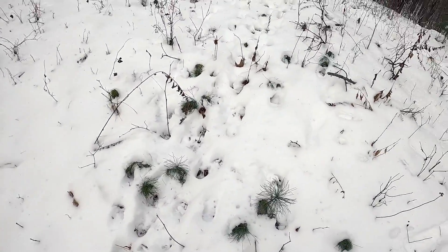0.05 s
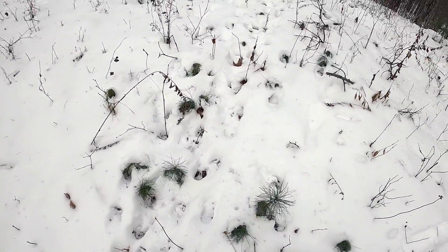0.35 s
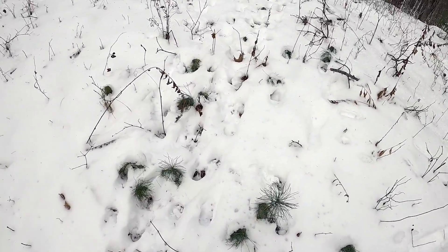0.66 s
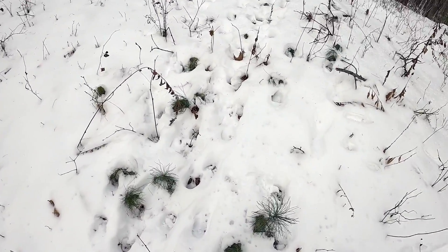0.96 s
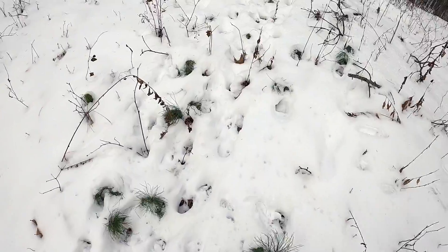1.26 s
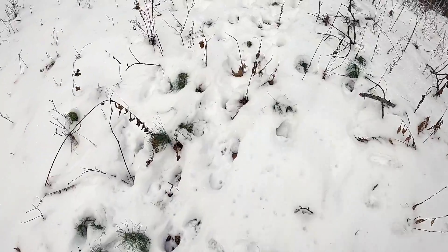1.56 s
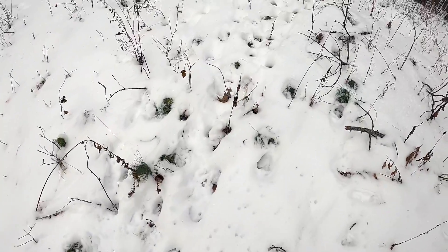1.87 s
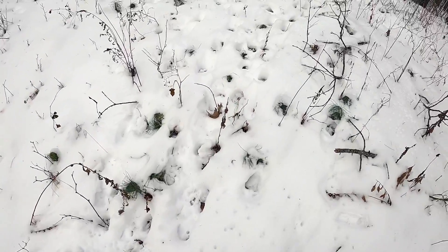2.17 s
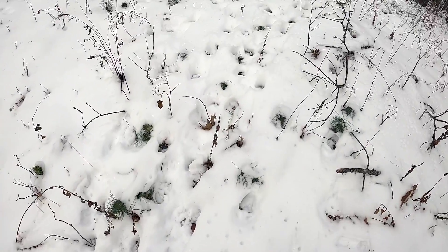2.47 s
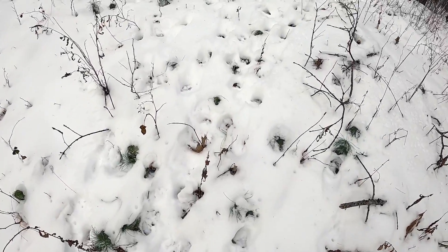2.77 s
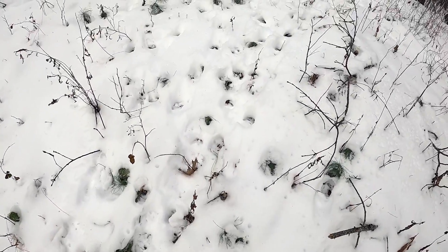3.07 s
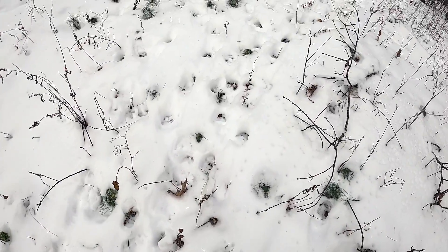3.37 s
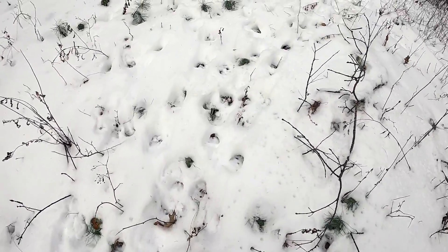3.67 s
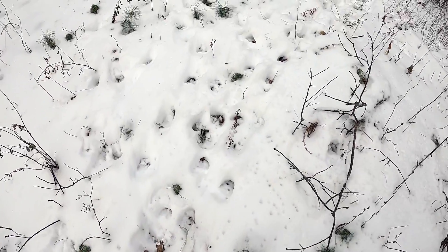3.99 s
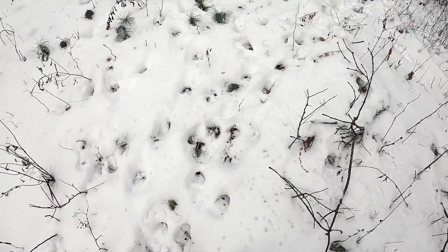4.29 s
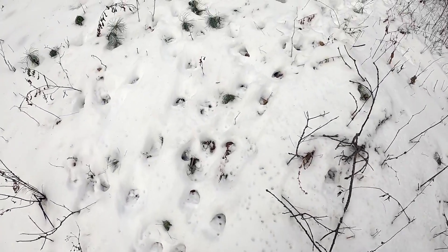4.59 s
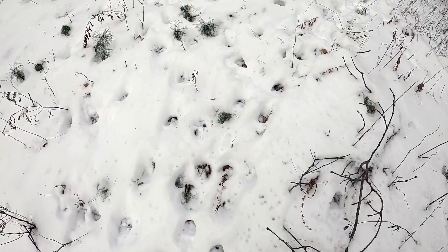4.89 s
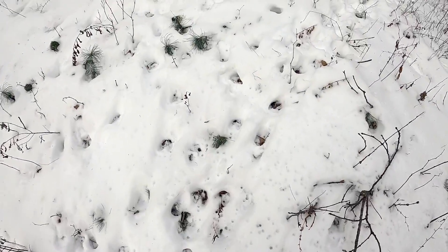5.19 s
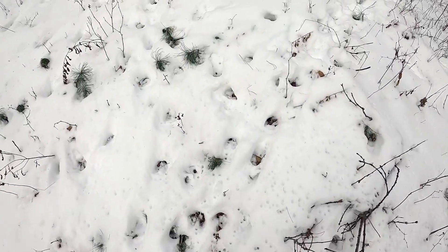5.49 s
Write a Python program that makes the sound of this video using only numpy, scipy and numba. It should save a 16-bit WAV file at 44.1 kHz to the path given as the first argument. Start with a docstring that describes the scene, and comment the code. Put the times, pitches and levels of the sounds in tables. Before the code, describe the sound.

Slow footsteps in ankle-deep snow are heard close, from the walker's hands, over the faint steady hush of still, echoless woods. Loose powder rustles and ticks softly at first, then the first boot lands at about 0.6 seconds. Further steps follow at about 1.3, 2.4, 3.5 and 4.7 seconds, the last three a little louder. Each one breaks the crust with a crisp, grainy crunch and packs the snow down in small, dull collapses, sometimes sinking in two or three goes. Between the steps the boots drag and swing on with quieter scuffs, bits of crust cracking and powder hissing. After the fifth step fades, a few light scuffs come from about 5.2 seconds, and at 5.6 seconds a dry twig snaps sharply, slightly to the right, with a short woody knock.

```python
"""Five slow steps through ankle-deep snow in still, echoless woods, heard from the walker's hands.
Loose powder rustles over a faint hush, then the first boot lands at 0.6 s. Each step breaks the crust,
crushes the grains and packs them in small dull collapses; then the boot drags and swings on, with bits
of crust cracking and powder hissing. The fifth step sinks in at 4.7 s, and at 5.6 s a twig snaps."""
import sys
import numpy as np
from scipy import signal
from scipy.fft import rfft, irfft, next_fast_len
from scipy.io import wavfile
from scipy.ndimage import uniform_filter1d
from numba import njit

SR = 44100
rng = np.random.default_rng(int(sys.argv[2]) if len(sys.argv) > 2 else 0)


def digitize_waveform(pressure):
    """Quantize a signal to 16-bit integers and store it at the path in sys.argv[1].

    Rows of a 2-D input are taken as channels; values are limited to [-1, 1].
    """
    field = np.atleast_2d(pressure).T
    bounded = np.clip(field, -1, 1)
    quanta = np.round(bounded * 32767).astype(np.int16)
    wavfile.write(sys.argv[1], SR, quanta)


N = 249089
TIME = np.arange(N) / SR

# EQ curves of the still air, the four snow layers and a brittle break: (frequency [Hz], level [dB])
AIR_EQ = [(20, -2), (60, 6.5), (100, -13), (200, 5), (330, -4.5), (750, -21), (1400, -11), (4000, -38),
          (9000, -53), (16000, -82)]
PACKING_EQ = [(20, -31), (45, -19), (85, -10.5), (130, -4), (180, 3.5), (280, -2), (390, -5.5), (520, -24),
              (1000, -68)]
CRUNCH_EQ = [(150, -32), (300, -8), (430, -0.5), (720, -2.5), (1100, -0.5), (1600, -5), (2100, -14.5),
             (4000, -51.5)]
CRUST_EQ = [(700, -27.5), (1400, -6.5), (1950, -1), (3100, -2), (4200, -5), (5600, -11.5), (7000, -14),
            (11000, -49)]
POWDER_EQ = [(3000, -25), (5000, 2), (6200, 0.5), (7000, -2.5), (8200, -1.5), (10000, -6.5), (12500, -10.5),
             (14200, -19), (16000, -40)]
BREAK_EQ = [(80, -35), (300, 7.5), (600, 4), (1300, 12), (2200, 6.5), (3800, 1.5), (6000, -2.5), (8200, -5),
            (12500, -21), (16000, -43)]
# how alike the two microphone ports sound: (frequency [Hz], likeness [0-1])
PORT_LIKENESS = [(30, .8), (60, .96), (130, .993), (600, .985), (1400, .97), (3100, .87), (6800, .66),
                 (15000, .5)]
# phase between the ports: (frequency [Hz], left lead [rad])
PORT_LEAD = [(100, 0), (400, -.02), (1000, -.1), (1800, -.25), (2700, -.65), (4300, -.7), (5600, -.9),
             (6900, -1.5), (8500, -.1), (15000, -.2)]
# balance of the ports: (frequency [Hz], left over right [dB])
PORT_BALANCE = [(200, 0), (700, -1), (1300, -.5), (2400, 1.5), (4400, -.8), (8100, -4.8), (15000, -1)]
# single breaks of the crust: (time [s], level [dB], brightness [dB/octave], decay [s])
CRUST_CRACKS = [(0.18, -54, -1, 0.003), (0.225, -50, 1, 0.002), (0.253, -49, 0, 0.002),
                (0.293, -47, 6, 0.002), (0.414, -48, 1, 0.003), (0.423, -47, 8, 0.002),
                (0.505, -36, 5, 0.001), (0.534, -44, 1, 0.0006), (0.553, -40, 1, 0.003),
                (0.965, -43, 1, 0.003), (1.284, -41, -1, 0.004), (1.459, -38, -3, 0.004),
                (1.506, -36, -4, 0.002), (1.642, -43, -2, 0.001), (1.888, -44, 0, 0.004),
                (2.257, -48, 2, 0.002), (2.402, -39, -2, 0.003), (2.42, -38, -3, 0.002),
                (2.447, -33, -5, 0.003), (2.459, -28, -5, 0.003), (2.978, -45, -4, 0.004),
                (3.304, -49, -5, 0.003), (3.467, -32, 0, 0.004), (3.475, -33, 0, 0.003),
                (3.795, -38, -2, 0.0012), (3.817, -40, -2, 0.002), (3.847, -40, -2, 0.002),
                (3.933, -42, -1, 0.001), (3.972, -39, -6, 0.002), (3.954, -46, -3, 0.001),
                (4.044, -42, -2, 0.002), (4.13, -56, 2, 0.001), (4.569, -47, 1, 0.004),
                (4.601, -42, 1, 0.004), (4.63, -46, 1, 0.003), (4.659, -31, 4, 0.003),
                (4.667, -38, 6, 0.002), (5.486, -42, 0, 0.003), (5.568, -36.5, -3, 0.003)]
# short low knocks: snow giving way under the sole and, last, the snapping twig's woody knock:
# (time [s], level [dB], final pitch [Hz], decay [s])
LOW_KNOCKS = [(0.18, -59.5, 200, 0.042), (0.837, -38.5, 125, 0.0084), (0.925, -36, 570, 0.0074),
              (1.352, -28.5, 166, 0.0086), (1.459, -28.5, 445, 0.0064), (1.478, -26, 160, 0.0073),
              (1.521, -30, 132, 0.0068), (1.575, -23, 187, 0.0041), (1.632, -27.5, 250, 0.0015),
              (1.893, -35.5, 233, 0.0089), (2.364, -35, 304, 0.004), (2.447, -22.5, 182, 0.008),
              (2.459, -25.5, 523, 0.0043), (2.63, -25, 208, 0.0028), (2.674, -37, 201, 0.0089),
              (2.706, -25, 198, 0.014), (2.998, -32, 241, 0.0035), (3.105, -49.5, 377, 0.0032),
              (3.558, -34, 170, 0.0052), (3.615, -30, 136, 0.031), (3.678, -31.5, 107, 0.021),
              (3.831, -29.5, 220, 0.0046), (4.708, -36, 115, 0.014), (4.770, -16.5, 187, 0.0032),
              (4.892, -25, 186, 0.0036), (4.986, -30.5, 92, 0.014), (5.056, -29, 189, 0.0093),
              (5.586, -29, 514, 0.0064)]
# the twig breaking: (time [s], level [dB])
TWIG_SNAPS = [(5.577, -15)]
# the ring of its wood: (frequency [Hz], relative level [dB], time to fall 60 dB [s])
TWIG_MODES = [(550, -12, 0.038), (943, -9.5, 0.04), (1160, -8, 0.036), (1350, -15, .04), (1690, -5, 0.032),
              (2410, -10, .04), (3200, 1.5, 0.02), (4790, 6.5, 0.0062), (5570, 2.5, 0.0089),
              (7800, -18, 0.034), (9630, -13, 0.019)]
# bed of loose snow between the steps: (time [s], crunch level [dB])
RUSTLE_LEVELS = [(0, -60), (0.35, -59.5), (1.25, -61), (2.0, -62.5), (3.15, -67), (3.42, -64.5),
                 (4.15, -65.5), (4.3, -70.5), (4.52, -76.5), (5.35, -66.5)]
# a boot brushing the surface as it lands, lifts or swings: (time [s], length [s], crunch level [dB],
# packing, crust, powder [dB re crunch], hollow pitch [Hz], left over right [dB])
BOOT_SCUFFS = [(0.225, 0.08, -53.5, -2, -8.5, -3.5, 1930, -1.5),
               (0.452, 0.15, -46.5, -9.5, 3, -0.5, 1400, -0.5), (1.755, 0.085, -47, -14, -1, -3, 1280, 4.5),
               (1.85, 0.054, -52.5, 0.5, 5, 1, 1480, 6), (2.1, 0.088, -58.5, 7, 0.5, 2, 414, 7),
               (2.26, 0.13, -52, -1, -0.5, -7, 875, 3.5), (2.92, 0.13, -57, -8, 6, -8, 1400, 3),
               (2.972, 0.047, -46.5, -5.5, -0.5, -25, 2010, 3),
               (3.224, 0.1, -54.5, -5.5, -0.5, -29, 1390, 2.5),
               (3.468, 0.024, -31.5, -11, 2.5, -6.5, 1530, 0), (4.038, 0.051, -45, -6, 7, -3.5, 1300, 2.5),
               (4.08, 0.036, -46.5, -8, 1, 2.5, 1300, 2.5), (4.405, 0.068, -60, -18, 2, -14, 1510, 2),
               (4.563, 0.13, -53, -16, 0.5, 1, 1180, -1),
               (5.199, 0.059, -44.5, -2.5, 4.5, -6.5, 1220, -0.5),
               (5.386, 0.071, -49, -7, -1, -14, 1550, 0), (5.488, 0.076, -43, -13, 2, -6.5, 1320, -1.5),
               (5.57, 0.078, -48.5, -4, 1.5, -7, 1600, -2)]
# weight on the snow, some steps sinking in several goes: (time [s], hold [s], roll to the toe [s],
# crunch level [dB], packing, crust, powder, roll [dB re crunch], crust lead [s],
# crust growth over the hold [dB], hollow pitch [Hz], hollow strength [dB])
BOOT_PRESSES = [(0.583, 0.11, 0.055, -40, -2, -0.5, -6.5, -10, 0.011, -0.5, 1100, -23),
                (0.739, 0.04, 0.095, -45, -1, -9, -16, 0.5, -0.012, 3, 463, 5),
                (0.898, 0.2, 0.081, -39, -0.5, -4, -10.5, -3, 0.0017, 2, 560, 0.5),
                (1.289, 0.086, 0.049, -41.5, 0, -1, -8, -25, -0.014, -6, 640, -10),
                (1.41, 0.099, 0.225, -40.5, -3, -2, -9.5, -3.5, -0.0076, -1, 494, -18),
                (2.432, 0.24, 0.2, -34, -1.5, -4, -13.5, -5.5, 0.0089, 6.5, 1006, -4.5),
                (3.49, 0.15, 0.39, -36, -0.5, 1.5, -8, -4.5, -0.016, -2.5, 980, -7),
                (4.688, 0.046, 0.019, -36, 2.5, -5.5, -15, 3, 0.023, 0.5, 1000, -32),
                (4.76, 0.17, 0.22, -35, -0.5, -1.5, -12, -4, -0.007, 7, 1000, -16)]

AIR_DB = -68
RUSTLE_MIX_DB = (-3, 1, -4.5)  # packing, crust, powder re crunch
LOAD_DB_PER_S, CRUST_LOAD_DB_PER_S, LIFT_DB_PER_S = 700, 510, 342
EASE_S, ROLL_SAG_DB_PER_S = 0.057, 30  # weight leaves the heel, then dwindles as the foot rolls
ROLL_PACKING_DB, ROLL_SURFACE_DB = 0.5, 1  # boosts during the roll
SCUFF_EDGE_DB, SCUFF_SQUARENESS = 6, 2.56  # drop at a scuff's ends, flatness of its top
OPEN_HZ, OPEN_DB = 1450, 3.5  # the hollow round an unloaded boot
LURCH_DB, LURCH_S = -15, 0.0073  # extra crunch as the boot drops: level re the knock, half length
UNEVEN_DB, UNEVEN_HZ = 0.8, 23.8  # level wobble as the snow yields unevenly


def amp(db):
    """Decibels to gain."""
    return 10 ** (np.asarray(db) / 20)


def unit_rms(x):
    """Normalises to rms 1."""
    return x / np.sqrt(np.mean(x ** 2) + 1e-20)


def value_at(points, hz):
    """A curve's value at hz, on a log-frequency axis."""
    point_hz, value = np.transpose(points)
    return np.interp(np.log(hz + 1), np.log(point_hz), value)


def add(mix, start, sound):
    """Drops a sound into the mix at start seconds."""
    part = mix[:, max(round(start * SR), 0):][:, :sound.shape[-1]]
    part += sound[..., :part.shape[1]]


def equalise(x, eq, slope_db=0, size=4096):
    """Minimum-phase EQ, tilted by slope_db per octave above 500 Hz: nothing rings before a click."""
    hz = abs(np.fft.fftfreq(size, 1 / SR))
    octaves = np.log2(np.maximum(hz, 500) / 2000)
    log_gain = np.log(amp(value_at(eq, hz) + slope_db * octaves))
    taps = np.fft.ifft(np.exp(np.conj(signal.hilbert(log_gain)))).real[:size // 2]
    return signal.oaconvolve(x, taps[None], axes=1)[:, :x.shape[1]]


def treble(x, hz):
    """The part of x above hz, in phase with x."""
    return signal.sosfiltfilt(signal.butter(1, hz, "high", fs=SR, output="sos"), x)


def wander(rate_hz):
    """Smooth random modulator of rms 1, moving up to about rate_hz."""
    size = next_fast_len(N)
    hz = np.fft.rfftfreq(size, 1 / SR)
    spectrum = rfft(rng.standard_normal(size)) * np.exp(-(hz / rate_hz) ** 2)
    return unit_rms(irfft(spectrum, size)[:N])


def mic_ports(mid_side):
    """Mid and side to stereo: two microphone ports hear much the same bass and ever less alike treble."""
    size = next_fast_len(N + 2048, True)
    hz = np.fft.rfftfreq(size, 1 / SR)
    mid, side = rfft(mid_side, size)
    likeness = np.clip(value_at(PORT_LIKENESS, hz), 0, 1)
    sign = np.array([[1], [-1]])
    pair = np.sqrt((1 + likeness) / 2) * mid + sign * np.sqrt((1 - likeness) / 2) * side
    balance = amp(sign * value_at(PORT_BALANCE, hz) / 2)
    phase_shift = np.exp(.5j * sign * value_at(PORT_LEAD, hz))
    return irfft(pair * balance * phase_shift, size)[:, :N]


def air():
    """The faint steady hush of the woods."""
    return amp(AIR_DB) * unit_rms(equalise(rng.standard_normal((2, N)), AIR_EQ))


def crumbs(crunch_db, per_s=28, base_db=-43, spread_db=4, follow=0.61, quiet_db=-60):
    """Single crumbs of ice snap or land: lone dry ticks, louder while the boot works."""
    chance = rng.random((N, 4))
    extra_db = spread_db * np.minimum(-np.log(chance[:, 1] + 1e-9), 3)
    tick_db = base_db + follow * (crunch_db - quiet_db) + extra_db
    ticks = (chance[:, 0] < per_s / SR) * amp(tick_db) * np.sign(chance[:, 2:].T - .5)
    return equalise(ticks, BREAK_EQ, slope_db=1.0)


def cracks(size=2048):
    """A plate of crust fails: a sudden, dying run of uneven clicks."""
    out, t = np.zeros((2, N)), TIME[:size]
    for start, db, slope_db, decay in CRUST_CRACKS:
        noise = rng.standard_normal((2, size))
        grit = amp(2 * np.repeat(rng.standard_normal(size // 16), 16))
        envelope = np.exp(-t / decay) * (1 - np.exp(-10 * t / decay))
        burst = equalise(noise * grit * envelope, BREAK_EQ, slope_db)
        energy = (burst ** 2).sum(1, keepdims=True) / SR
        add(out, start, amp(db) * burst / np.sqrt(energy / .01))  # level as if spread over 10 ms
    return out


def knocks(size=4096):
    """A snow pocket collapses or the twig gives: a short low knock, sagging in pitch, no deep bass."""
    out, t = np.zeros((2, N)), TIME[:size]
    for start, db, hz, decay in LOW_KNOCKS:
        cycles = np.cumsum(hz * (1 + 0.91 * np.exp(-t / 0.0013))) / SR
        add(out[:1], start, amp(db) * np.sin(2 * np.pi * cycles) * np.exp(-t / decay))  # mid only
    return signal.sosfilt(signal.butter(2, 65, "high", fs=SR, output="sos"), out)


def twig(size=6000):
    """Dry wood snaps, a little to the right: a splintering tick, then a ring building in a few cycles."""
    out, t = np.zeros((2, N)), TIME[:size]
    for start, db in TWIG_SNAPS:
        ring = np.zeros((2, size))
        for hz, mode_db, t60 in TWIG_MODES:
            envelope = amp(mode_db - 60 * t / t60) * (1 - np.exp(-t * hz / 1.4))
            ring += envelope * np.sin(2 * np.pi * (hz * t + rng.random((2, 1))))
        splinters = unit_rms(equalise(rng.standard_normal((2, size)), BREAK_EQ, slope_db=2.5))
        tick = splinters * np.exp(-t / 0.0014)
        add(out, start, amp(db) * (amp(-7.5) * ring + amp(-5.5) * tick))
    return mic_ports(out) * amp([[-2], [2]])


@njit
def ring_out(onsets, lengths, poles, phasors, size):
    """Sums dying sines: from its onset, each phasor is turned and damped by its pole every sample."""
    out = np.zeros((2, size))
    for i in range(len(onsets)):
        for channel in range(2):
            z = phasors[i, channel]
            for n in range(onsets[i], min(onsets[i] + lengths[i], size)):
                out[channel, n] += z.real
                z *= poles[i]
    return out


def grains(eq, per_s, spread_db, cycles, clumps_db):
    """Ice bonds break at random: tiny pings, each with its own size and pitch, dying in a cycle or two."""
    chance = rng.random((N, 5))
    onsets = np.flatnonzero(chance[:, 0] < per_s / SR)
    low_hz, high_hz = eq[0][0], eq[-1][0]
    hz = low_hz + (high_hz - low_hz) * chance[onsets, 1]
    size_db = spread_db * np.minimum(-np.log(chance[onsets, 2]), 4) + clumps_db[onsets]
    sizes = np.sqrt(hz) * amp(size_db)
    decay_samples = cycles * SR / hz
    phasors = sizes[:, None] * np.exp(2j * np.pi * chance[onsets, 3:])  # own phase in mid and side
    poles = np.exp(2j * np.pi * hz / SR - 1 / decay_samples)
    lengths = (5 * decay_samples).astype(np.int64)
    return equalise(ring_out(onsets, lengths, poles, phasors, N), eq)


def steady_feed(cloud, steady_s):
    """The boot feeds in energy steadily, so a big break leaves less for the next: rms 1 over steady_s."""
    span = int(steady_s * SR)
    power = uniform_filter1d(uniform_filter1d(cloud ** 2, span), span)
    return cloud / np.sqrt(abs(power) + 1e-4 * power.mean())


def hollow(x, hz, strength_db, width_hz):
    """The gap between boot and snow rings broadly: deep as the sole presses, thin as the toe drags."""
    carrier = np.exp(2j * np.pi * np.cumsum(hz) / SR)
    pole = np.exp(-np.pi * width_hz / SR)
    resonance = (carrier * signal.lfilter([1 - pole], [1, -pole], x / carrier)).real
    return x + 2 * amp(strength_db) * resonance


def flake_showers(crunch_db, per_s=50, decay_s=0.0029, height=1.34, muffled_db=-42):
    """Gain spikes as brittle flakes let go in tiny showers; the boot's full weight smothers them."""
    onsets = (rng.random(N) < per_s / SR) * rng.random(N)
    showers = signal.lfilter([1], [1, -np.exp(-1 / (decay_s * SR))], uniform_filter1d(onsets, 4))
    return 1 + height * showers / (1 + amp(crunch_db - muffled_db))


def tread(start, hold, roll, roll_db, load_db_per_s):
    """Weight comes on, holds, eases as the foot rolls, and lifts: envelope [dB] and easing [0-1]."""
    rolled = TIME - start - hold
    eased = np.clip(rolled / EASE_S, 0, 1)
    loading = load_db_per_s * np.minimum(TIME - start, 0)
    leaving = ROLL_SAG_DB_PER_S * np.maximum(rolled, 0) + LIFT_DB_PER_S * np.maximum(rolled - roll, 0)
    return np.maximum(loading + roll_db * eased - leaving, -100), eased


def gait():
    """Rustle, presses, scuffs and lurches add in power, driving the snow's level, mix, hollow and pan."""
    rustle_db = np.interp(TIME, *np.transpose(RUSTLE_LEVELS))
    # rows: crunch, packing, crust, powder
    power = amp([0, *RUSTLE_MIX_DB])[:, None] ** 2 * amp(rustle_db) ** 2
    hollow_shift, pan = np.zeros((2, N)), np.zeros(N)  # both weighted by crunch power
    for (start, hold, roll, db, packing_db, crust_db, powder_db, roll_db,
         lead, grow_db, hollow_hz, hollow_db) in BOOT_PRESSES:
        weight_db, eased = tread(start, hold, roll, roll_db, LOAD_DB_PER_S)
        surface_db, _ = tread(start - lead, hold + lead, roll, roll_db, CRUST_LOAD_DB_PER_S)
        held = np.clip((TIME - start) / hold, 0, 1)
        surface_db += grow_db * (held - .5) * (1 - eased) + ROLL_SURFACE_DB * eased
        weight, surface = amp(db + weight_db) ** 2, amp(db + surface_db) ** 2
        power += [weight, weight * amp(packing_db + ROLL_PACKING_DB * eased) ** 2,
                  surface * amp(crust_db) ** 2, surface * amp(powder_db) ** 2]
        hollow_shift += np.outer([hollow_hz - OPEN_HZ, hollow_db - OPEN_DB], weight)
    for start, length, db, packing_db, crust_db, powder_db, hollow_hz, pan_db in BOOT_SCUFFS:
        near = abs(TIME - start - length / 2) < 2 * length
        off_centre = abs(2 * (TIME[near] - start) / length - 1)
        swell = amp(db - SCUFF_EDGE_DB * off_centre ** SCUFF_SQUARENESS) ** 2
        power[:, near] += np.outer(amp([0, packing_db, crust_db, powder_db]) ** 2, swell)
        hollow_shift[0, near] += (hollow_hz - OPEN_HZ) * swell
        pan[near] += pan_db * swell
    hollow_hz, hollow_db = hollow_shift / power[0] + [[OPEN_HZ], [OPEN_DB]]
    lurches = sum(amp(db + LURCH_DB) ** 2 * np.exp(-np.minimum(((TIME - start) / LURCH_S) ** 2, 20))
                  for start, db, _, _ in LOW_KNOCKS)
    crunch_db = 10 * np.log10(power[0] + lurches)
    mix_db = 10 * np.log10(power[1:] / power[0])
    return crunch_db, mix_db, hollow_hz, hollow_db, pan / power[0]


def snow(crunch_db, mix_db, hollow_hz, hollow_db):
    """The sole sinks in fits: each tiny avalanche stirs dull packing, crunch, crisp crust and powder."""
    packing_db, crust_db, powder_db = mix_db
    fits = 0.79 * wander(76) + 0.18 * wander(570)
    packing = grains(PACKING_EQ, per_s=830, spread_db=4.0, cycles=1.2, clumps_db=4.5 * fits)
    packing = steady_feed(packing, steady_s=0.015)
    crunch = grains(CRUNCH_EQ, per_s=2600, spread_db=1.0, cycles=1.92, clumps_db=0.9 * fits)
    crunch = steady_feed(hollow(crunch, hollow_hz, hollow_db, width_hz=260), steady_s=0.08)
    crust = grains(CRUST_EQ, per_s=5000, spread_db=-2.0, cycles=1.32, clumps_db=0.87 * fits)
    # the crust breaks bright where powder is loose, dull where it is pressed flat
    looseness = amp(1.16 * (powder_db - crust_db + 11.5))
    crust = steady_feed(crust + (looseness - 1) * treble(crust, hz=3900), steady_s=0.028)
    powder = grains(POWDER_EQ, per_s=8000, spread_db=0.0, cycles=1.55, clumps_db=1.4 * fits)
    powder = steady_feed(powder, steady_s=0.066)
    body = amp(packing_db - 2.58) * packing + amp(-1.9) * crunch
    sparkle = amp(crust_db - 1.7) * crust + amp(powder_db - 3.5) * powder
    wobble = amp(UNEVEN_DB * wander(UNEVEN_HZ))
    return wobble * amp(crunch_db) * (body + flake_showers(crunch_db) * sparkle)


def scene():
    """Boots and twig over the hush; the scuffs pan only the boots' treble."""
    crunch_db, mix_db, hollow_hz, hollow_db, pan_db = gait()
    steps = snow(crunch_db, mix_db, hollow_hz, hollow_db)
    boots = mic_ports(steps + cracks() + crumbs(crunch_db) + knocks())
    pan_gain = amp(np.array([pan_db, -pan_db]) / 2)
    boots = boots + treble(boots, hz=1430) * (pan_gain - 1)
    return boots + twig() + mic_ports(air())


def record(dry):
    """A steep high cut at 15.8 kHz."""
    high_cut = signal.firwin(511, 15800, window=("kaiser", 9), fs=SR)
    return signal.oaconvolve(dry, high_cut[None], "same")


dry = scene()
out = record(dry)
digitize_waveform(out)
```